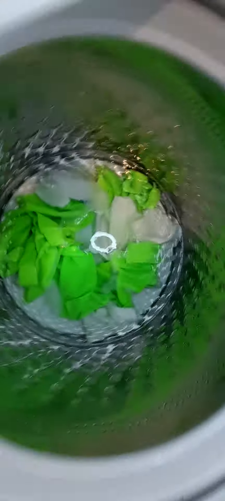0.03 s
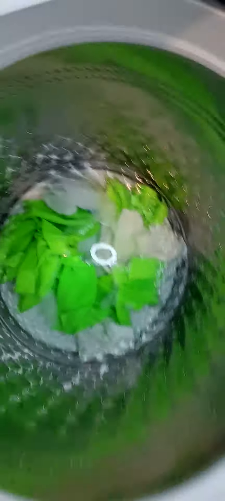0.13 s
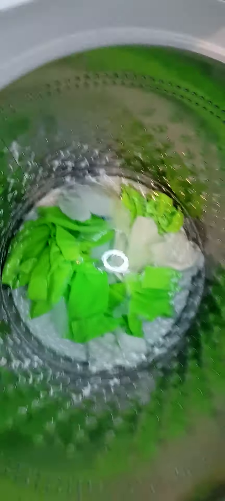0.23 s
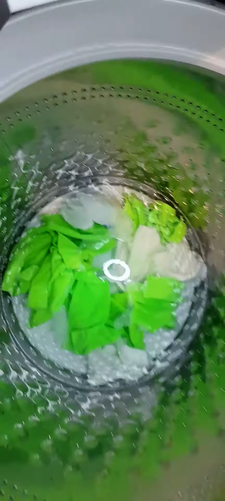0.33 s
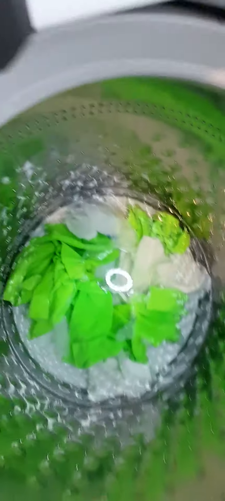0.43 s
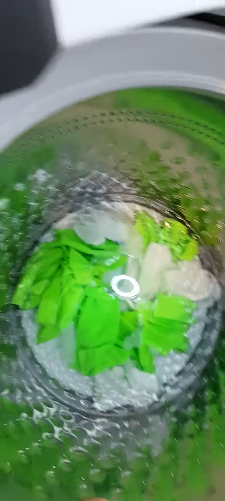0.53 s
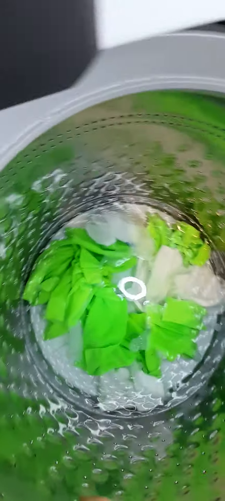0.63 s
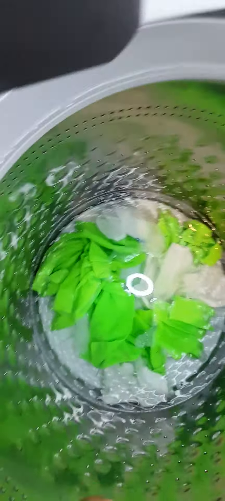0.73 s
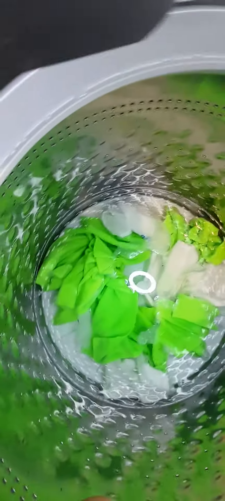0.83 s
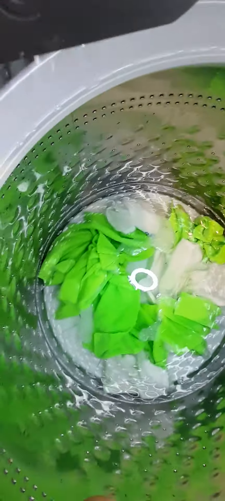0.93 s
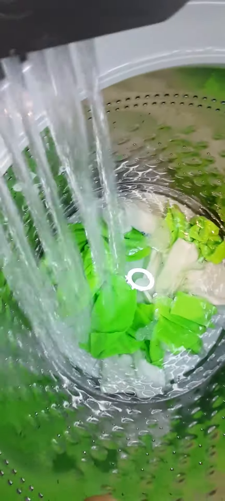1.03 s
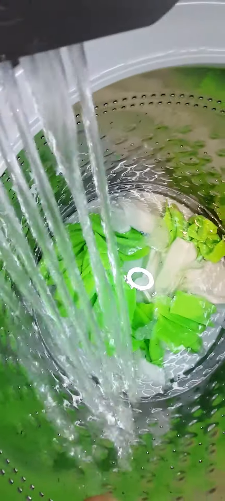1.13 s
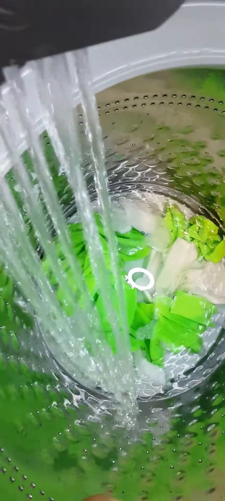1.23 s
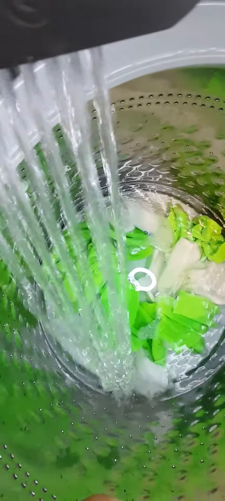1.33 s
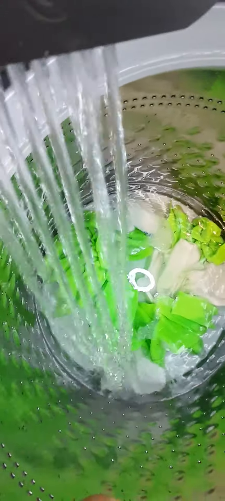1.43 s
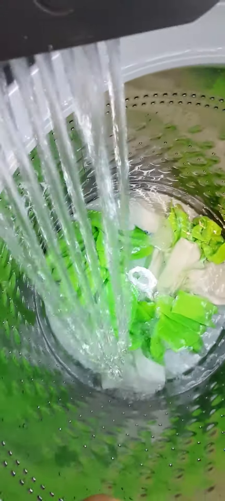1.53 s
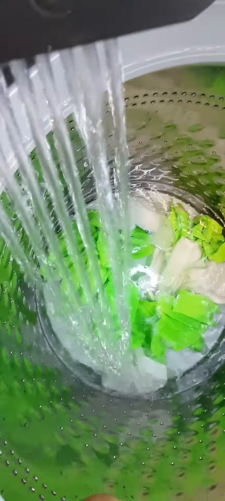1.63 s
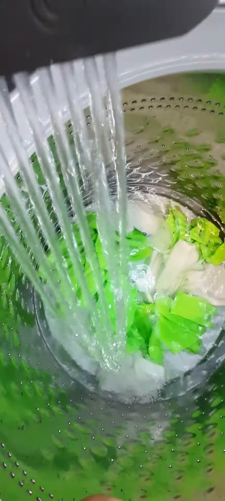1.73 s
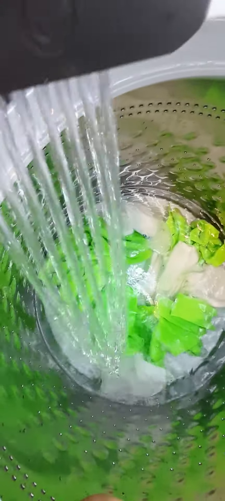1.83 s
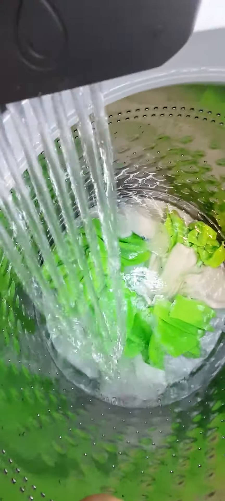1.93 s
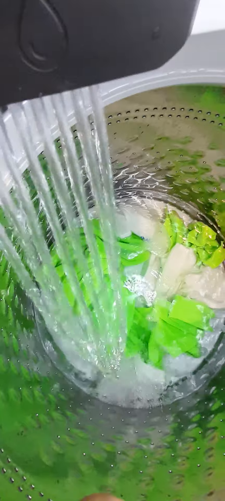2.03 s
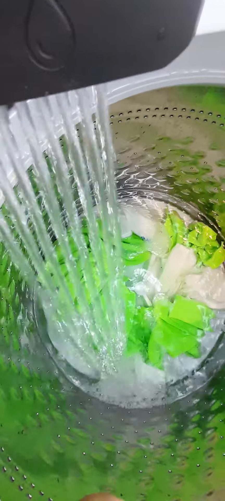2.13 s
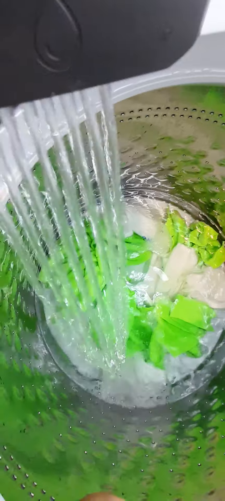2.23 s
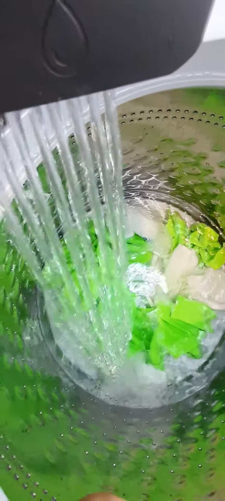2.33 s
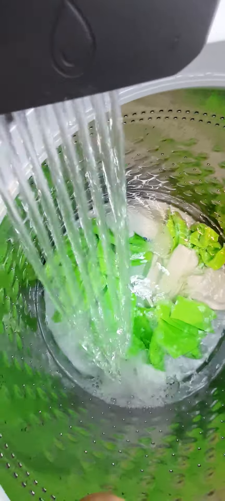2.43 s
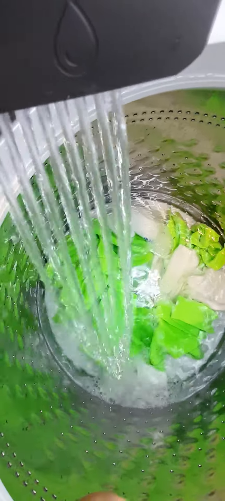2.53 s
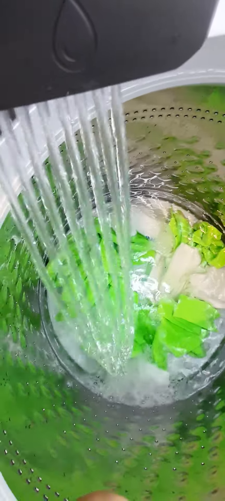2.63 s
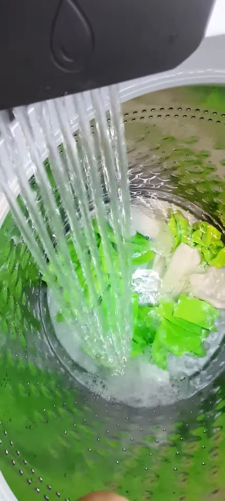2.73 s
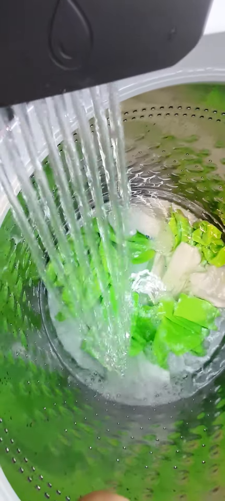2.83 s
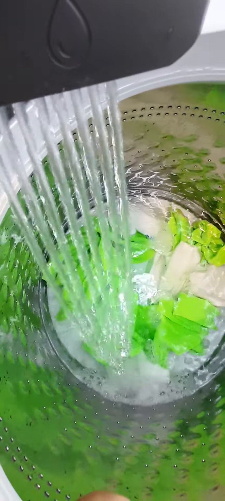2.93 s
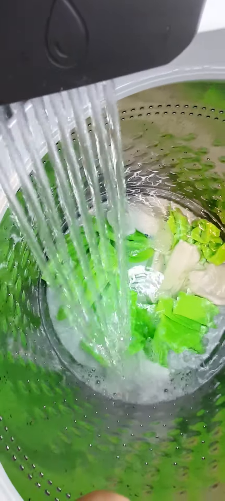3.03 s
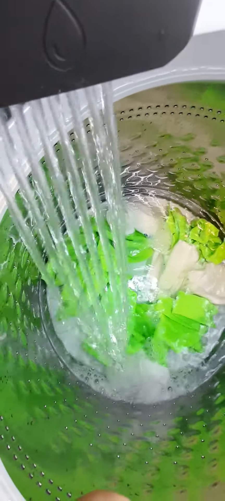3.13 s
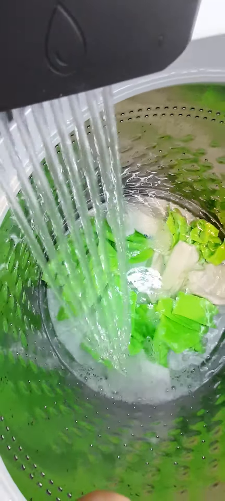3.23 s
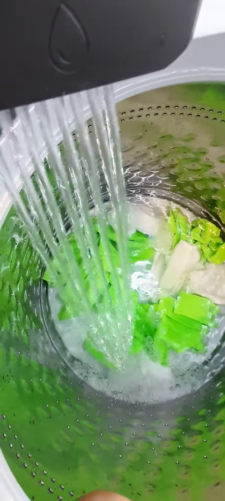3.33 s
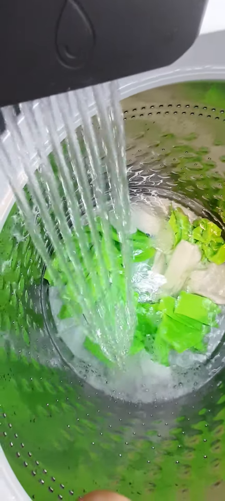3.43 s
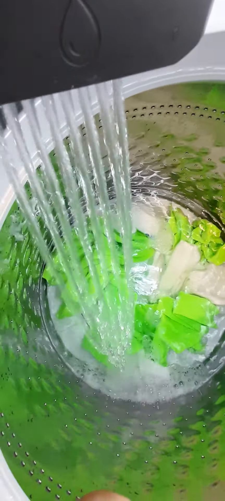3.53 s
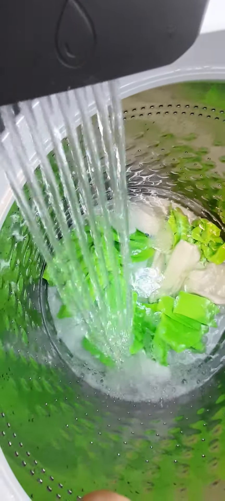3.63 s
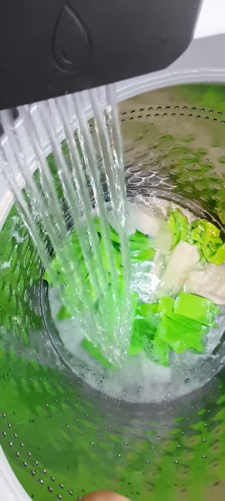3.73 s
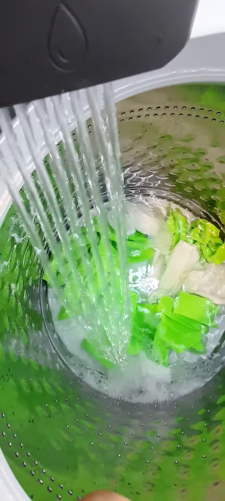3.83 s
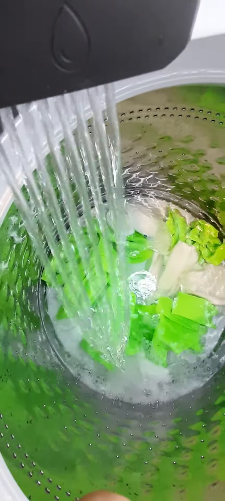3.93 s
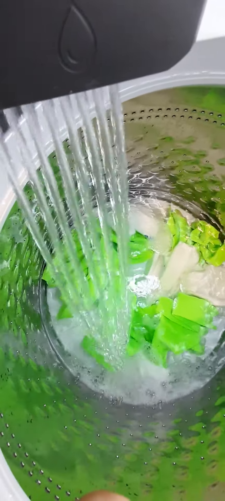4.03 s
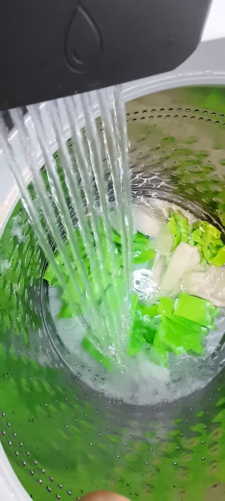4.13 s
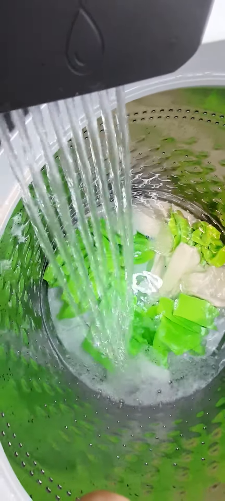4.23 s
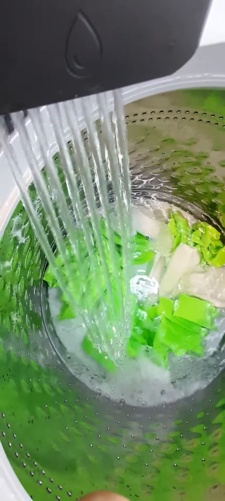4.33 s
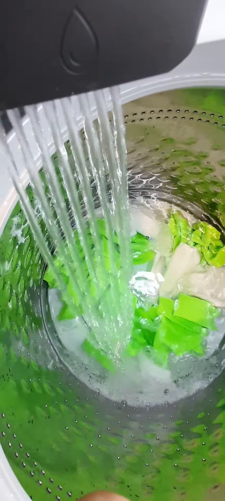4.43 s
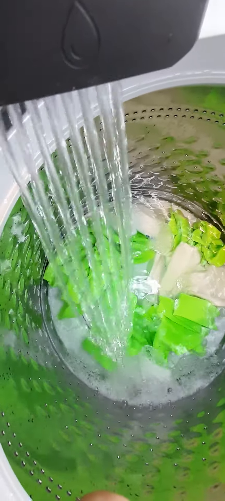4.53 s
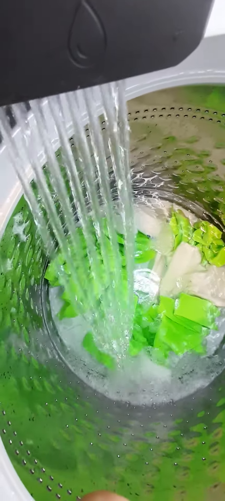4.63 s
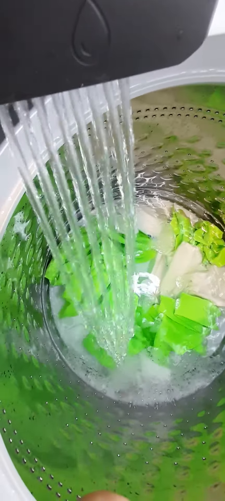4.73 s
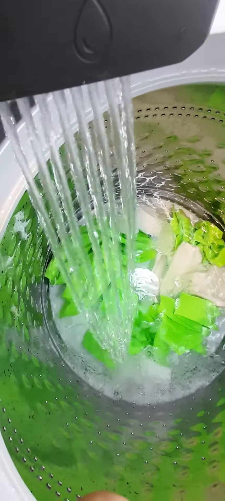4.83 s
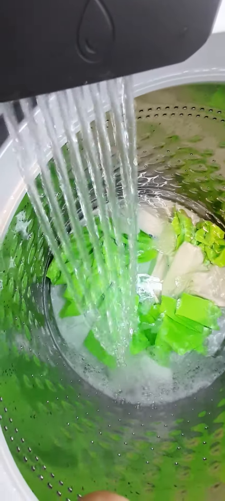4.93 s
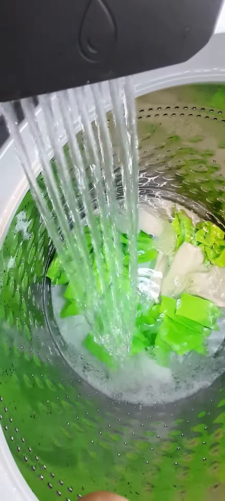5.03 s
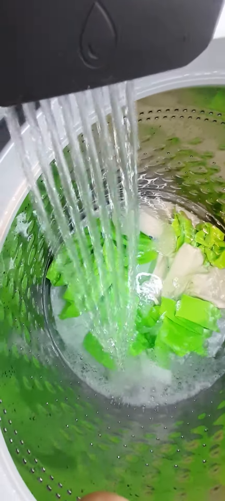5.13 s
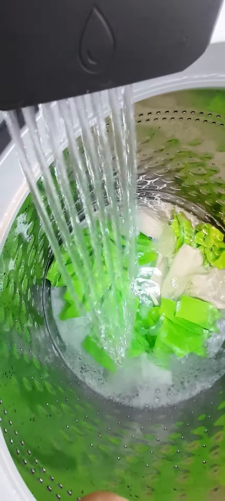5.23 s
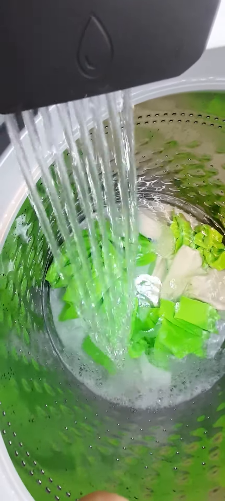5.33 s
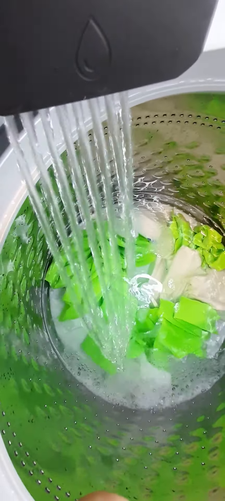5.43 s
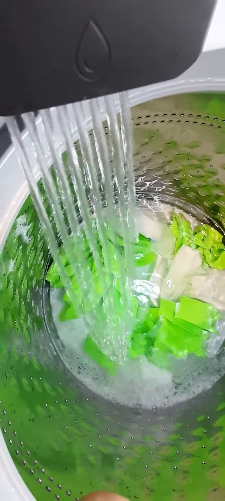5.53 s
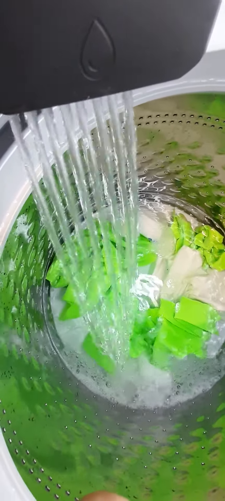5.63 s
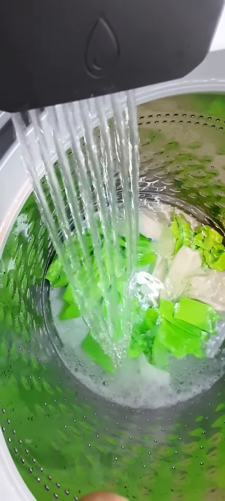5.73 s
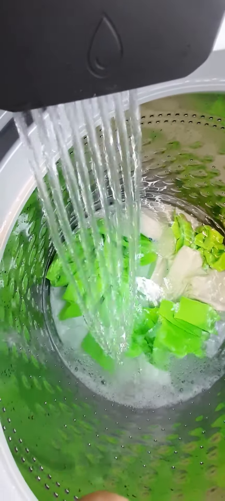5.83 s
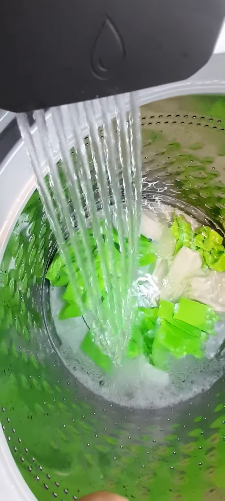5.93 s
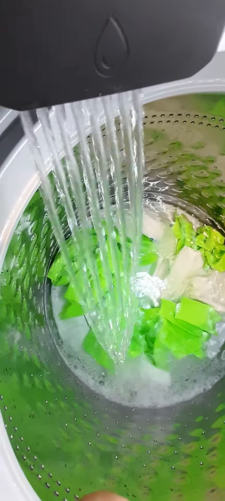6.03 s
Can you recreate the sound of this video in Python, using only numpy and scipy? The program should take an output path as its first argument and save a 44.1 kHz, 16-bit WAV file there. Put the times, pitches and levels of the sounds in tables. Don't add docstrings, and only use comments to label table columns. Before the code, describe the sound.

Almost a second of near silence: low room rumble, faint foam fizz, a few soft drop ticks. Then an inlet valve knocks and booms, a low electrical hum begins, air whistles briefly, and a fan of water jets bursts into a bright steady hiss. It spatters on wet clothes with small slaps and bubbly gurgles, inside a resonant steel drum, heard close on a handheld phone in stereo. The rush continues to the end.

```python
import sys
import numpy as np
from scipy import signal
from scipy.fft import rfft, irfft, next_fast_len
from scipy.io import wavfile

SR = 44100
rng = np.random.default_rng(int(sys.argv[2]) if len(sys.argv) > 2 else 0)


def rack_gain(trim_db):
    fader = np.asarray(trim_db, float)
    return 10 ** (fader / 20)


def generate_wav(signal):
    frames = np.transpose(np.atleast_2d(signal))
    scaled = np.clip(frames, -1, 1) * 32767
    pcm = np.round(scaled).astype(np.int16)
    wavfile.write(sys.argv[1], SR, pcm)


N = 268128
T = np.arange(N) / SR
SIZE = next_fast_len(N + SR // 2)
HZ = np.arange(SIZE // 2 + 1) * SR / SIZE + 1e-3

# centre_hz, width_hz, left_db, right_db, port_likeness (0-1), right_lead_rad
DRUM_MODES = [(262, 52, 4.5, 5.5, 0.66, -1.17), (306, 58, -7, -7.8, 0.81, -1),
              (399, 82, -1.9, 7.5, 0.67, 0.0), (428, 37, -2.5, -3.6, 0.92, -1), (480, 41, 1.5, 3, 1, -0.0),
              (616, 53, 6.5, 7, 0.71, 1.4), (658.5, 23, -5.8, 10.5, 1, 1.04), (687, 29, -6.5, -3, 0, 1.5),
              (791, 81, 7, 3, 0.69, 2), (1094, 54, 7, -1.5, 0.56, 2.1), (1135, 34, 5.5, -0.5, 0.3, 2.5),
              (1210, 84, 1, -1, 0.88, 3.5), (1507, 74, 3, 0.7, 0.1, 1), (1580, 63, 9.5, 4.5, 0.4, 1.7),
              (1713, 185, -6, -4, 0.31, -2.5), (2278, 41, 12, 4, 0.64, -1.5),
              (3100, 93, 2.2, -2.5, 0.36, 2), (3440, 34, 3.5, 1, 0.93, 0), (3610, 36, 2, 5.5, 0.7, 1.95),
              (3890, 96, 1, 4.5, 0.34, 0.4)]


def rms_one(x):
    return x / np.sqrt(np.mean(x ** 2) + 1e-20)


def at_hz(points):
    hz, *columns = np.transpose(points)
    return np.array([np.interp(np.log(HZ), np.log(hz), c) for c in columns])


def shaped(x, response):
    return irfft(rfft(x, SIZE) * response, SIZE)[..., :N]


def band(x, low_hz, high_hz):
    return signal.sosfilt(signal.butter(2, [low_hz, high_hz], "band", fs=SR, output="sos"), x)


def panned(x, left_right_db):
    return x * rack_gain(np.array([[0.5], [-0.5]]) * left_right_db)


def add(out, start_s, shape, left_right_db):
    i = round(start_s * SR)
    out[:, i:i + shape.shape[-1]] += panned(shape, left_right_db)[:, :N - i]


def swell(start_s, rise_s, fall_s):
    t = np.maximum(T - start_s, 0)
    shape = (1 - np.exp(-t / rise_s)) * np.exp(-t / fall_s)
    return shape / shape.max()


def drift(spread_db, rate, count=1):
    r = np.exp(-80 * np.pi * rate / SR)
    noise = rng.standard_normal((count, N // 40 + 2002))
    slow = signal.lfilter([1], [1, -2 * r, r * r], noise)[:, 2000:]
    return np.repeat(rack_gain(spread_db * rms_one(slow)), 40, axis=1)[:, :N]


def flowing(full_db, share):
    # time_s, level_db
    flow = [(.962, -101), (.968, -79), (.992, -49), (1.06, -39), (1.08, -27.5), (1.114, -23), (1.15, -27),
            (1.32, -26.5), (1.38, -26.5), (1.588, -27), (1.608, -33), (1.618, -27), (1.75, -27.5)]
    jets_db = np.interp(T, *np.transpose(flow), left=-400)
    return rack_gain(full_db + share * (jets_db - (-25.5)))


def room():
    # freq_hz, level_db_per_hz
    spectrum = [(18, -45), (30, -12), (41, -28), (64, -4.5), (77, -3.5), (118, -9.5), (141, -22),
                (189, -34), (300, -32), (338, -25.5), (384, -36), (1460, -52), (5450, -61), (14800, -48),
                (16000, -50)]
    mid, side = shaped(rng.standard_normal((2, N)), rack_gain(at_hz(spectrum)[0]))
    side = shaped(side, np.clip(0.12 + HZ / 700, 0, 1))
    return rack_gain(-59) * (mid + side * [[1], [-1]]) / np.std(mid)


def foam():
    # start_s, level_db
    bursts = [(.02, -85), (.1, -77), (.2, -87), (.33, -79), (.42, -84), (.5, -84), (.62, -90), (.8, -89)]
    level = rack_gain(-93) + sum(rack_gain(db) * swell(s, rise_s=0.012, fall_s=0.057) for s, db in bursts)
    pops = rng.standard_normal((2, N)) * drift(spread_db=2.5, rate=40.0)
    fizz = rack_gain(3.0) * rms_one(band(pops, 6600, 8200))
    fizz += rack_gain(6.0) * rms_one(band(pops, 11500, 17000))
    fizz += rack_gain(-4.5) * rms_one(band(pops, 4150, 5400))
    return level * fizz


def drops():
    # start_s, peak_db
    single_drops = [(0.057, -71), (0.203, -59), (0.266, -55.5), (0.352, -59.5), (0.479, -71), (0.588, -64)]
    out, t = np.zeros((2, N)), T[:SR // 50]
    pulse = np.exp(-((t - 0.0012) / 0.00041) ** 2)
    for s, db in single_drops:
        splash = 0.54 * band(rng.standard_normal((2, len(t))), 2200, 9000) * np.exp(-t / 0.0023)
        add(out, s, rack_gain(db + 4.5) * (splash - pulse), 0.0)
    return out


def solenoid():
    # multiple_of_buzz, level_db
    harmonics = [(1, 0.5), (2, -26.5), (3, -15)]
    buzz_hz, on_s = 119.95, 0.94
    pull_db = 8 * swell(1.105, rise_s=0.05, fall_s=0.15)
    level = rack_gain(-37.5 + pull_db) * drift(spread_db=1.1, rate=5.3)[0]
    level *= 1 - np.exp(-np.maximum(T - on_s, 0) / 0.095)
    buzz = sum(rack_gain(db + 3.5) * np.sin(2 * np.pi * k * buzz_hz * T + k) for k, db in harmonics)
    return level * buzz * rack_gain(np.array([[2.4], [-3.0]]))


def cabinet():
    # freq_hz, level_db_per_hz
    boom = [(30, -31), (45, -37), (60, -6), (73, -3.5), (90, -5), (104, 1), (130, -11), (150, -55)]
    # start_s, level_db
    knocks = [(.968, -46), (1.004, -31.5), (1.086, -25), (1.18, -33), (1.265, -40), (1.345, -44)]
    panels = rms_one(shaped(rng.standard_normal(N), rack_gain(at_hz(boom)[0])))
    panels *= flowing(full_db=-41, share=0.54)
    hammer = sum(rack_gain(db + 4.0) * swell(s, rise_s=0.035, fall_s=0.047) ** 2 for s, db in knocks)
    panels += hammer * np.sin(2 * np.pi * 72.9 * T)
    return panned(panels, 1.2)


def cracks(events, last_s, cut_db):
    out, t = np.zeros((2, N)), T[:SR // 12]
    envelope = (1 - np.exp(-t / 0.00029)) * np.exp(-t / last_s)
    for s, db, hz, left_right_db in events:
        jags_db = 2.5 * np.repeat(rng.standard_normal(len(t) // 64 + 1), 64)[:len(t)]
        noise = rng.standard_normal((2, len(t))) * rack_gain(jags_db)
        burst = band(noise * envelope, hz / 1.16, min(hz * 1.43, 19000))
        add(out, s, rack_gain(db - cut_db) * burst / abs(burst).max(), left_right_db)
    return out


def valve_plunger():
    # start_s, peak_db, centre_hz, left_right_db
    knocks = [(0.9714, -59, 1090, 6), (0.992, -29.5, 1150, 10), (1.0276, -24.5, 2330, 9)]
    return cracks(knocks, last_s=0.0091, cut_db=3.5)


def nozzle():
    # centre_hz, width_hz, level_db
    slots = [(2150, 88, -3), (2297, 140, 3), (3660, 400, -5.5), (12900, 1800, -4)]
    response = sum(rack_gain(db) * 1j * HZ * width / (hz ** 2 - HZ ** 2 + 1j * HZ * width)
                   for hz, width, db in slots)
    hiss = rms_one(shaped(rng.standard_normal(N), response))
    purge = rack_gain(-31.5) * swell(1.052, rise_s=0.026, fall_s=0.28)
    return panned((purge + flowing(full_db=-39.5, share=1)) * hiss, 3.0)


def droplets(per_s, low_hz, high_hz, spread_db, clump_db, clump_rate):
    bulk = np.minimum(rng.exponential(1, (6, N)), 4)
    hits = rng.choice([-1., 1.], (6, N))
    born = rng.random((6, N)) < per_s / SR
    dealt = rng.integers(0, 3, (6, N))
    hits *= born
    hits[born] *= rack_gain(spread_db * bulk[born])
    edges_hz = np.linspace(low_hz, high_hz, 4)
    total = 0
    for k in range(3):
        clumped = hits * (dealt == k) * drift(clump_db, clump_rate, count=6)
        total = total + band(clumped + 1e-18, edges_hz[k], edges_hz[k + 1])
    return rms_one(total)


def causal(gain_db):
    cepstrum = irfft(gain_db * np.log(10) / 20, SIZE)
    cepstrum[..., 1:SIZE // 2] *= 2
    return np.exp(rfft(cepstrum[..., :SIZE // 2 + 1], SIZE))


def brief(response):
    spread_s = 0.012
    lag_s = np.minimum(np.arange(SIZE), SIZE - np.arange(SIZE)) / SR
    return rfft(irfft(response, SIZE) * np.exp(-(lag_s / spread_s) ** 2))


def drum(spots):
    # freq_hz, left_db_per_hz, right_db_per_hz
    water_colour = [(150, -0.5, -5), (203, -9.5, -8), (500, 1.5, -1.1), (960, -5.0, -4.5), (2030, -3, -4),
                    (3500, 1.46, -1.6), (4170, 0.85, -2.8), (6140, -4.5, -0.5), (7560, 0, 3),
                    (7830, 2.5, -0.7), (8640, -5.5, -12.5), (10570, -7.5, -7.5), (13350, -2.9, -2.0),
                    (15700, -7.5, -10.5)]
    t60_s, unalike_hz = 0.073, 4920
    t = T[:SR // 4]
    tails = rng.standard_normal((3, len(spots), len(t))) * rack_gain(-60 * t / t60_s)
    tails[..., 0] += 6.9 * rng.choice([-1, 1], (3, len(spots)))
    tails = rfft(tails, SIZE)
    tails = tails / np.sqrt(np.mean(abs(tails) ** 2, axis=1, keepdims=True))

    hz, width, left_db, right_db, alike, lead = np.transpose(DRUM_MODES)
    link = np.interp(HZ, [*hz, unalike_hz], [*(alike * np.exp(1j * lead)), 0])
    alike = abs(link)
    to_ports = np.array([np.sqrt(alike), link / np.sqrt(alike + 1e-9)])
    shared = tails[0] * brief(to_ports)[:, None]
    own = tails[1:] * brief(np.sqrt(np.clip(1 - alike, 0, 1)))
    ports = np.sum((shared + own) * rfft(spots, SIZE), axis=1)

    peaks = 1 / (1 + (2 * (HZ - hz[:, None]) / width[:, None]) ** 2)
    modes_db = np.array([left_db, right_db]) @ peaks
    return irfft(ports * causal(at_hz(water_colour) + modes_db), SIZE)[:, :N]


def water():
    landing_s, pool_forms_s = 1.335, 1.56
    surge = drift(spread_db=0.87, rate=36.0)
    mist = flowing(full_db=-27.5, share=0.76) * droplets(
        5000, 5760, 17300, spread_db=5.0, clump_db=2.5, clump_rate=22)
    spray = flowing(full_db=-32, share=0.94) * droplets(
        1500, 1854, 5160, spread_db=3.0, clump_db=1.5, clump_rate=32)

    landing = rack_gain(-30.5) * swell(landing_s, rise_s=0.056, fall_s=0.095)
    landing = landing * rms_one(band(rng.standard_normal((6, N)), 1150, 2140))
    early = rack_gain(-4 * (T < landing_s))
    spatter = flowing(full_db=-37, share=0.64) * early * droplets(
        700, 832, 2004, spread_db=5.0, clump_db=3.5, clump_rate=11.5)
    patter = flowing(full_db=-38, share=1) * droplets(
        25, 2500, 11000, spread_db=5.0, clump_db=2.5, clump_rate=27.0)

    depth = rack_gain(-3.5 * np.exp(-np.maximum(T - pool_forms_s, 0) / 0.12))
    churn = flowing(full_db=-42, share=0.35) * depth * droplets(
        300, 313, 808, spread_db=4.0, clump_db=4.0, clump_rate=16)

    shudder = rack_gain(-45) * swell(0.97, rise_s=0.06, fall_s=0.11)
    floor_level = shudder + flowing(full_db=-45.5, share=0.23) * drift(spread_db=1.5, rate=8.0)
    floor = floor_level * rms_one(band(rng.standard_normal((6, N)), 152, 312))
    return drum(surge * (mist + spray) + landing + spatter + patter + churn + floor)


def slaps():
    # start_s, peak_db, centre_hz, left_right_db
    lumps = [(1.3816, -9, 1880, 4), (1.492, -12.5, 3900, 1), (1.5525, -15, 1980, 7),
             (1.6197, -8.5, 3430, 3), (1.9094, -13.5, 6600, -2), (1.9708, -15, 4070, -1),
             (2.0835, -14.5, 3600, 12), (2.2901, -12, 6840, 0.0), (2.5086, -14, 3950, 2),
             (2.6667, -16, 4200, 1.0), (2.9855, -11, 4000, 0.5), (3.1128, -14, 3780, 0.5),
             (3.3843, -16, 4020, 4), (3.6779, -15, 3950, 7), (3.7657, -11, 7950, 0),
             (3.875, -13.5, 7200, 2), (3.9937, -23, 3600, 1.5), (4.204, -14.5, 3500, 6.5),
             (4.2823, -14, 3060, 8), (4.5225, -10, 4860, 3), (4.6506, -10.5, 4630, 0),
             (5.1606, -16.5, 8300, 8), (5.298, -12, 6400, -3), (5.3511, -17, 3940, 2),
             (5.5634, -21, 3660, -4), (5.617, -14.5, 7250, 3), (5.661, -13, 6400, 0.0),
             (5.685, -7, 4500, 3), (5.9005, -21, 3830, 1.5)]
    return cracks(lumps, last_s=0.012, cut_db=-0.5)


def bubbles():
    # start_s, peak_db, pitch_hz
    large_bubbles = [(1.434, -22, 540), (1.749, -23.5, 613), (1.948, -22.5, 480), (2.016, -19.5, 630),
                     (2.087, -27, 498), (2.178, -21.5, 480), (2.259, -25.5, 495), (2.39, -26.5, 668),
                     (2.669, -26.5, 540), (2.862, -28, 610), (2.975, -24, 557), (3.062, -25, 508),
                     (3.288, -27, 546), (3.32, -22, 500), (3.41, -28, 542), (3.59, -23, 483),
                     (3.89, -17.5, 545), (3.939, -21, 476), (4.175, -18.5, 607), (4.444, -19.5, 500),
                     (4.524, -18, 402), (4.715, -25.5, 500), (4.829, -19.5, 486), (4.956, -20.5, 552),
                     (5.066, -28, 632), (5.388, -29, 670), (5.565, -22.5, 553), (5.741, -26, 508),
                     (5.954, -24.5, 491), (6.055, -24, 645)]
    out, t = np.zeros((2, N)), T[:SR // 8]
    mode_hz, _, left_db, right_db, *_ = np.transpose(DRUM_MODES)
    for s, db, hz in large_bubbles:
        ring = (1 - np.exp(-t / 0.0056)) * np.exp(-t * hz / 6.8)
        tone = ring / ring.max() * np.sin(2 * np.pi * hz * t)
        left_right_db = 1.07 * np.interp(hz, mode_hz, left_db - right_db)
        add(out, s - 0.004, rack_gain(db - 6.0) * tone, left_right_db)
    return out


def scene():
    idle = room() + foam() + drops()
    opening = solenoid() + cabinet() + valve_plunger() + nozzle()
    return idle + opening + water() + slaps() + bubbles()


def top_cut(x):
    return signal.sosfilt(signal.butter(12, 17080, fs=SR, output="sos"), x)


def record(dry):
    cut = signal.sosfilt(signal.ellip(12, 0.3, 80, 15760, fs=SR, output="sos"), dry)
    return top_cut(cut)


dry = scene()
out = record(dry)
generate_wav(out)
```